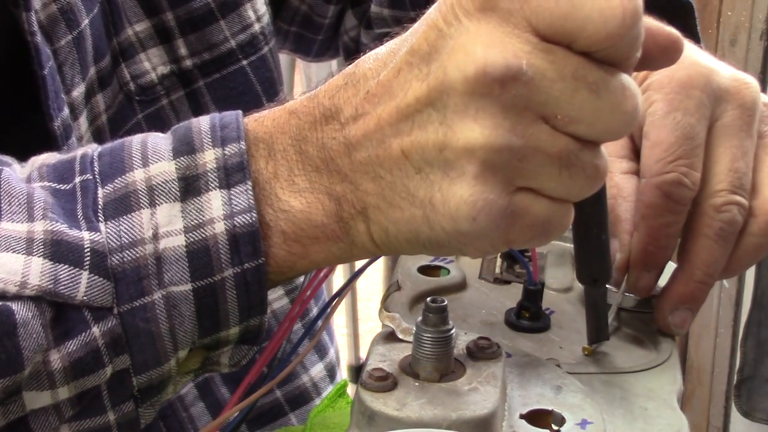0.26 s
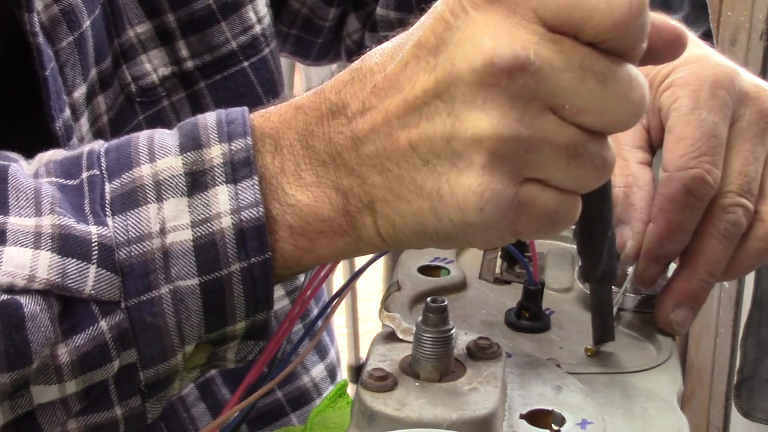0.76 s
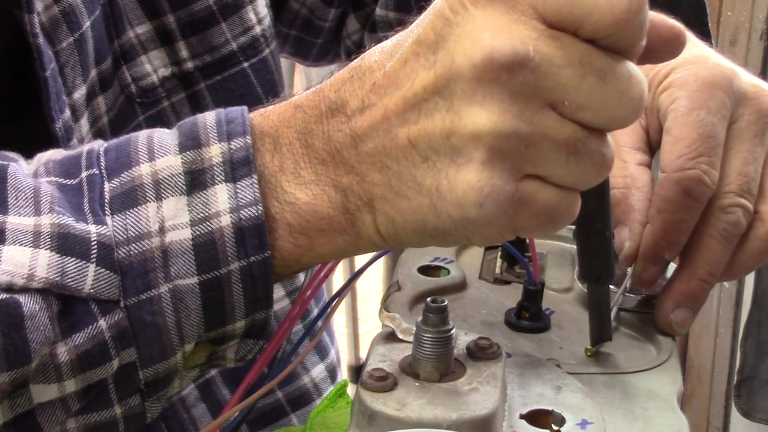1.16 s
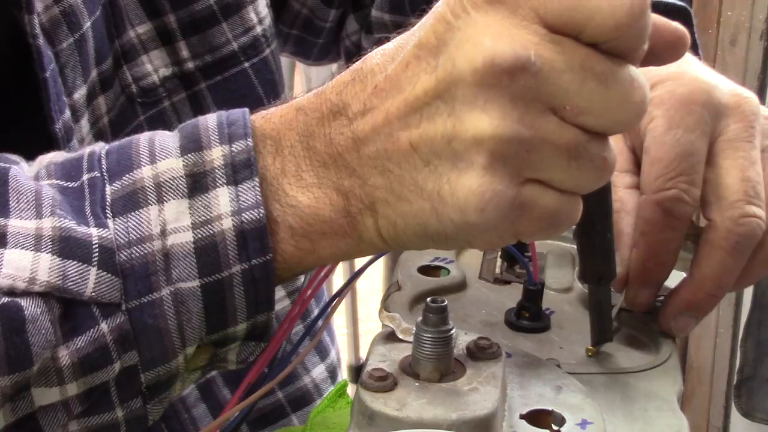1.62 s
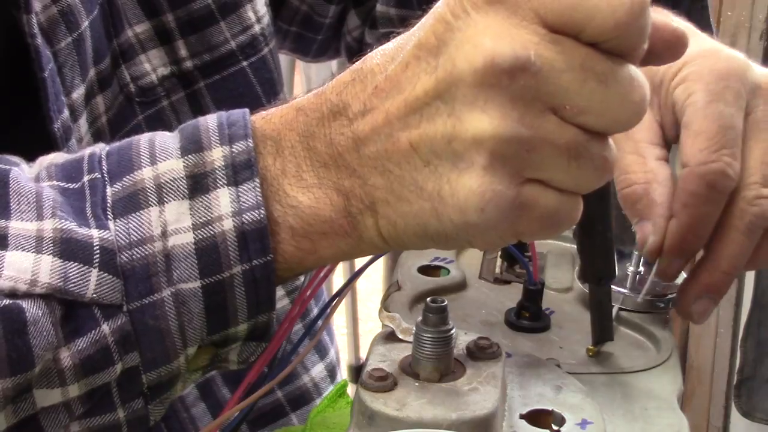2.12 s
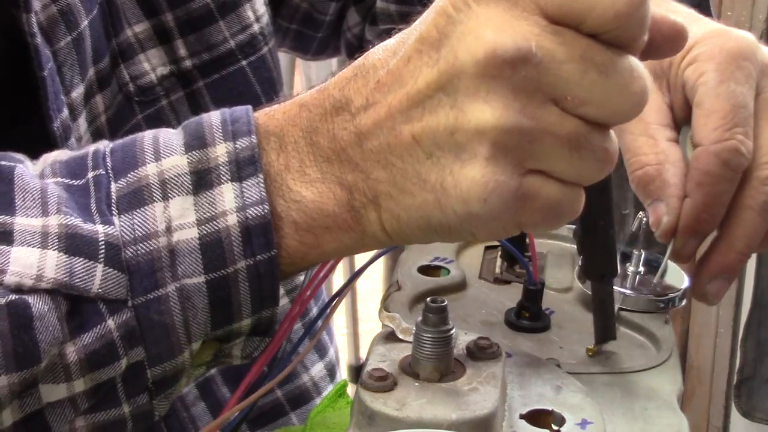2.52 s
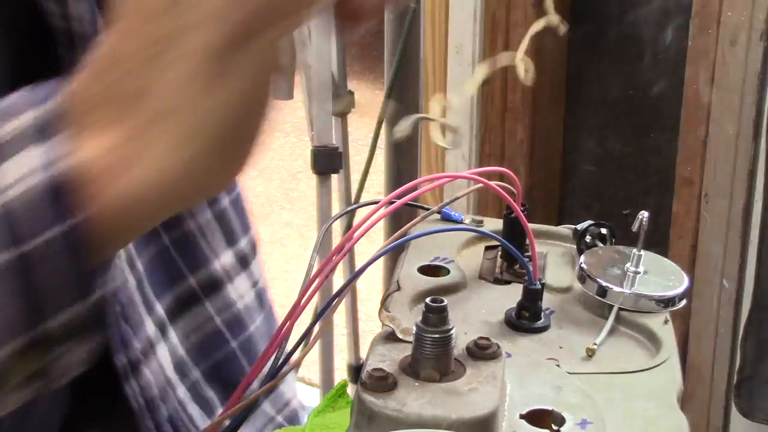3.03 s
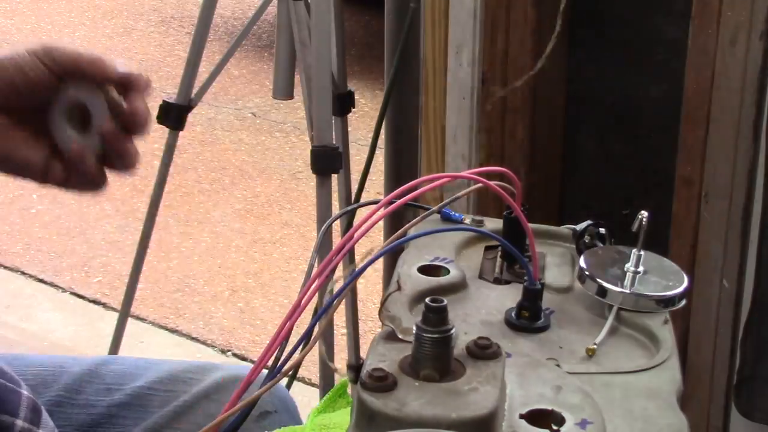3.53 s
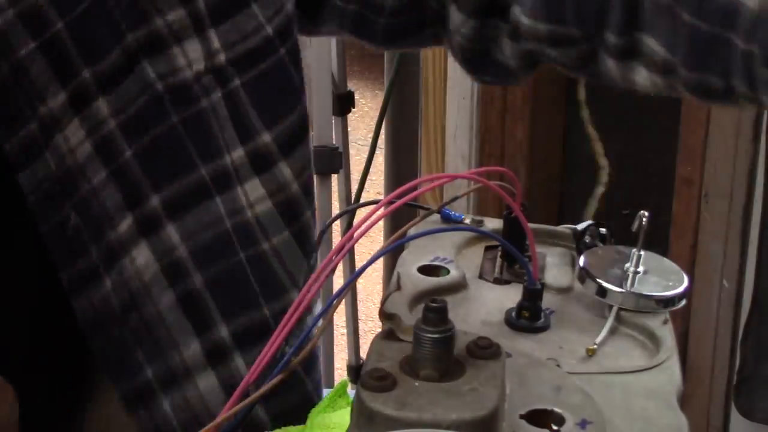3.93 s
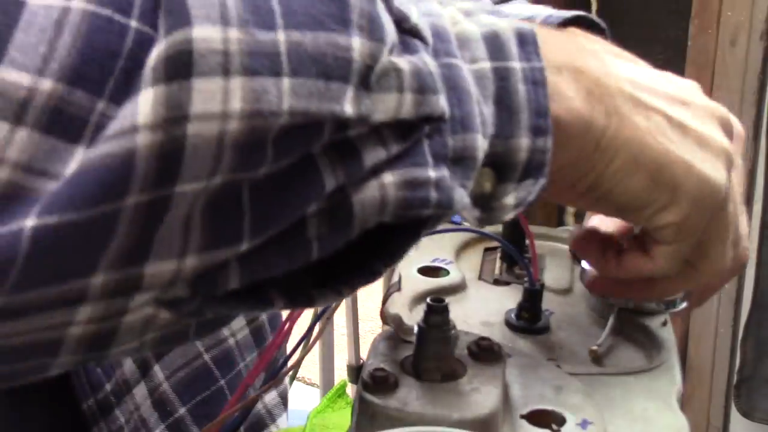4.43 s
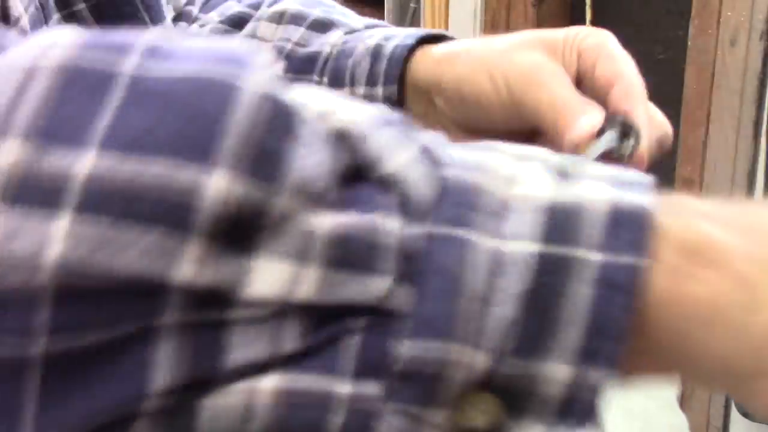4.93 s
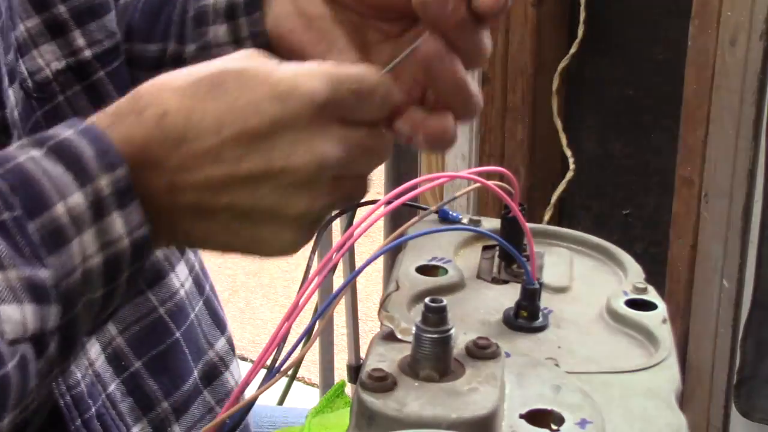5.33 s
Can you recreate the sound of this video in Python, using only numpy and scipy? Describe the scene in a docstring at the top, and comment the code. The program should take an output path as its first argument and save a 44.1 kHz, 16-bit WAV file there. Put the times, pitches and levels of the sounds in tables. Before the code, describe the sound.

Close small-metal handling in an open shed: tiny ticks, a scraping slide into a hollow stand, knocks, one loud landing, then a hard snap.

```python
"""Hands work on a small metal panel in an open shed doorway, close to the microphone. From the start there are
outdoor air, far traffic rumble, faint tones (one cricket-like), a throbbing whine and finger ticks: noise and clicks.
Contacts ring bench, hollow stand, panel and small bright hardware: resonators struck by bursts of clicks.
Then comes smooth friction; an iron is slid into its stand (grit feeds the same bodies) and single notes ring on.
Parts knock on the bench, a heavy part lands, later a magnet snaps and the panel shudders, then faint ticks."""
import sys
import numpy as np
from scipy import signal
from scipy.fft import rfft, irfft, next_fast_len
from scipy.io import wavfile

SR = 44100
rng = np.random.default_rng(int(sys.argv[2]) if len(sys.argv) > 2 else 0)


def put_to_file(sound):
    """Save the sound as 16-bit audio at rate SR, in the file named by the first command-line argument."""
    columns = np.atleast_2d(sound).T  # one column per channel
    safe = np.clip(columns, -1, 1)
    whole_steps = np.round(safe * 32767)
    wavfile.write(sys.argv[1], SR, whole_steps.astype(np.int16))


N = 245195


def from_db(db):
    """Decibels to gain."""
    return 10 ** (np.asarray(db) / 20)


def rms_one(x):
    """Scale to rms 1."""
    return x / np.sqrt(np.mean(x ** 2) + 1e-20)


def in_time(rows):
    """Columns of a level curve at every sample; silent outside it."""
    s, *columns = np.transpose(rows)
    t = np.arange(N) / SR
    return np.array([np.interp(t, s, column, left=-150, right=-150) for column in columns])


def high_pass(x, hz, order):
    """Butterworth low cut."""
    return signal.sosfilt(signal.butter(order, hz, "high", fs=SR, output="sos"), x)


def low_pass(x, hz):
    """Gentle first-order high cut."""
    return signal.sosfilt(signal.butter(1, hz, fs=SR, output="sos"), x)


def coloured(spectrum):
    """Noise shaped to a spectrum of (frequency [Hz], relative level per Hz [dB]), rms 1."""
    hz, db = np.transpose(spectrum)
    size = next_fast_len(N)
    log_hz = np.log(np.fft.rfftfreq(size, 1 / SR) + 1)
    gain = from_db(np.interp(log_hz, np.log(hz), db))
    return rms_one(irfft(rfft(rng.standard_normal(size)) * gain, size)[:N])


def waver(spread_db, rate_hz):
    """A gain that wanders by chance: noise through two equal low-pass poles, in decibels."""
    step = 40   # samples for which each gain is held
    warm_up = 2000
    r = np.exp(-2 * np.pi * rate_hz * step / SR)
    noise = rng.standard_normal(N // step + warm_up + 2)
    slow = signal.lfilter([1], [1, -2 * r, r * r], noise)[warm_up:N // step + warm_up + 1]
    return np.repeat(from_db(spread_db * rms_one(slow)), step)[:N]


def ring(force, hz, width_hz):
    """A damped resonator: a unit click sets a sine of height 1 ringing."""
    r, w = np.exp(-np.pi * width_hz / SR), 2 * np.pi * hz / SR
    return signal.lfilter([0, np.sin(w)], [1, -2 * r * np.cos(w), r * r], force + 1e-18)


def resonant_noise(hz, width_hz):
    """Noise through the same resonator twice, rms 1."""
    return rms_one(ring(ring(rng.standard_normal(N), hz, width_hz), hz, width_hz))


def grains(per_s, spread_db, count):
    """Random clicks of uneven size and sign."""
    sizes = from_db(spread_db * np.minimum(rng.exponential(1, count), 4))
    signs = rng.choice([-1, 1], count)
    return sizes * signs * (rng.random(count) < per_s / SR)


def air(level_db):
    """Outdoor air: broad noise of unsteady level."""
    # spectrum of the open air: (frequency [Hz], relative level per Hz [dB])
    air_spectrum = [(15, -55), (25, -40), (150, -4), (192, -9), (245, -7), (399, -5.5), (725, -2),
                    (1680, -5), (2460, -10.5), (3060, -7.5), (3800, -13), (11300, -21.5), (15200, -22.5),
                    (16500, -49)]
    return from_db(level_db) * waver(0.46, 12) * coloured(air_spectrum)


def rumble(level_db):
    """Far traffic: noise in low resonances that swell and fade separately."""
    # far resonances: (frequency [Hz], width [Hz], relative level [dB])
    resonances = [(189, 43, -15), (265.4, 26, -8.5), (330.5, 37, -8.5)]
    far = np.zeros(N)
    for hz, width_hz, db in resonances:
        far += from_db(db) * waver(3.86, 1.46) * rms_one(ring(rng.standard_normal(N), hz, width_hz))
    return from_db(level_db) * far


def background_tones():
    """Faint lasting tones, one low and two high and cricket-like: narrow resonant noise of flickering level."""
    # tones: (frequency [Hz], width of each resonator pass [Hz], level [dB], flicker spread [dB])
    tones = [(238.7, 4.5, -72, 1.5), (3480, 15, -74.5, 2.5), (4657, 12, -83.5, 2.5)]
    out = np.zeros(N)
    for hz, width_hz, db, flicker_db in tones:
        out += from_db(db) * waver(flicker_db, rate_hz=5) * resonant_noise(hz, width_hz)
    return out


def whine():
    """A thin high sine throbs evenly under a squared cosine, then stops."""
    tone_hz, level_db, end_s = 11122, -75.5, 2.82
    throbs_per_s, throb_peak_s = 15.0, 0.265
    t = np.arange(N) / SR
    throb = np.cos(np.pi * throbs_per_s * (t - throb_peak_s)) ** 2
    tone = np.sin(2 * np.pi * tone_hz * t)
    return from_db(level_db) * waver(1.5, 4.0) * (t < end_s) * throb * tone


def background():
    """The place around the bench: air and far rumble with their deep bass cut, plus faint tones and whine."""
    # slow levels: (time [s], air level [dB], far rumble level [dB])
    levels = [(0, -58, -58), (.7, -58.5, -59.5), (1.3, -59, -60.5), (1.7, -59, -64), (3.0, -57, -64.5),
              (5.56, -55.5, -63.5)]
    air_db, rumble_db = in_time(levels)
    outdoors = high_pass(air(air_db) + rumble(rumble_db), 55, order=2)
    return outdoors + background_tones() + whine()


def finger_ticks():
    """Faint finger ticks on the wire: sparse uneven clicks, band-passed."""
    ticks_per_s, click_db = 47, -44.5   # click level ahead of the band and of the spread in size
    band = signal.butter(2, [1500, 7000], "band", fs=SR, output="sos")
    return from_db(click_db) * signal.sosfilt(band, grains(ticks_per_s, 3.2, count=N) + 1e-18)


def contact_bursts(hit_s, hit_db):
    """Each contact is a first touch, then a dying rattle of clicks; gives sample places and forces."""
    # decay times [s]: every contact rattles longer while the iron is loose in its stand
    rattle_s, loose_rattle_s = 0.0038, 0.0081
    loose_from_s, loose_to_s = 3.1, 3.9
    after = np.arange(1300)   # samples
    clicks = grains(5000, 2.95, count=len(hit_s) * after.size)
    force = clicks.reshape(len(hit_s), -1) * 0.22
    loose = (hit_s > loose_from_s) & (hit_s < loose_to_s)
    decay_s = np.where(loose, loose_rattle_s, rattle_s)[:, None]
    force *= np.exp(-after / SR / decay_s)
    force[:, 0] = from_db(-7.5)   # the first touch
    force *= from_db(hit_db)[:, None]
    at = ((hit_s[:, None] * SR).astype(int) + after).ravel()
    return at, force


def body(modes, broad, hit_s, hit_db, slide, mode_db, luck_db):
    """Hits strike each mode with a strength of their own; sliding grit feeds the same modes."""
    at, rattle = contact_bursts(hit_s, hit_db)
    low_hz, high_hz, broad_db = broad
    grit = rms_one(grains(2300, 2.0, count=N) * waver(2.2, 37.3))
    grit *= slide * np.sqrt(2 * (high_hz - low_hz) / SR)   # slide is then about the level in the band
    rings = np.zeros(N)
    for hz, width_hz, db in modes:
        luck = from_db(rng.normal(0, luck_db, (len(hit_s), 1)))
        hits = np.bincount(at, (rattle * luck).ravel(), N)[:N]
        force = hits + grit * waver(luck_db, 17.0)
        rings += from_db(db + mode_db) * ring(force, hz, width_hz)
    rings = high_pass(rings, 0.81 * low_hz, order=2)   # small bodies radiate no bass
    band = signal.butter(3, [low_hz, high_hz], "band", fs=SR, output="sos")
    clatter = signal.sosfilt(band, np.bincount(at, rattle.ravel(), N)[:N] + grit)
    spread = from_db(broad_db) * SR / (2 * (high_hz - low_hz))   # a unit click comes out about broad_db high
    return rings + spread * clatter


def hardware(s, hit_db, rub):
    """Small bright hardware: treble modes of nearly constant balance and a broad clatter."""
    # modes: (frequency [Hz], width [Hz], relative level [dB])
    modes = [(4020, 180, -14), (4315, 140, 1), (4910, 240, 3.5), (5440, 130, -5), (5770, 110, -7),
             (6216, 58, -5.5), (6760, 150, -11.5), (7160, 580, -15), (7670, 600, -26)]
    # clatter: (low edge [Hz], high edge [Hz], level [dB])
    broad = (4000, 9000, 0)
    return body(modes, broad, s, hit_db, rub * from_db(-0.5), mode_db=-16.5, luck_db=0.5)


def stand(s, hit_db, rub):
    """The hollow stand: a few low-mid modes, struck unevenly."""
    # modes: (frequency [Hz], width [Hz], relative level [dB])
    modes = [(650, 80, -14.5), (770.6, 40, -1), (826, 50, -7.5), (950, 71, -13), (1050, 56, -13)]
    # clatter: (low edge [Hz], high edge [Hz], level [dB])
    broad = (610, 1160, -7.5)
    return body(modes, broad, s, hit_db, rub * from_db(-4), mode_db=-6, luck_db=3.5)


def panel(s, hit_db, rub):
    """The metal panel: many middle modes, struck unevenly."""
    # modes: (frequency [Hz], width [Hz], relative level [dB])
    modes = [(1212, 48, -5), (1437, 75, 2), (1708, 82, -1), (1822, 78, 0.5), (2065, 35, -11),
             (2304, 270, 3.5), (2702, 61, -6), (3072, 130, -5), (3530, 28.6, -19), (3784, 34, -20)]
    # clatter: (low edge [Hz], high edge [Hz], level [dB])
    broad = (1100, 4000, -1)
    return body(modes, broad, s, hit_db, rub * from_db(-6.5), mode_db=-12.5, luck_db=3.5)


def fine_parts(s, hit_db, rub):
    """The finest parts: modes at the top of the treble, struck very unevenly."""
    # modes: (frequency [Hz], width [Hz], relative level [dB])
    modes = [(8900, 420, -2), (10900, 460, -4), (13100, 400, 0.7), (15740, 400, 6)]
    # clatter: (low edge [Hz], high edge [Hz], level [dB])
    broad = (10570, 16100, 0)
    return body(modes, broad, s, hit_db, rub * from_db(-4), mode_db=-17.5, luck_db=4.0)


def shed(x):
    """A short diffuse tail of unit energy, duller than the direct sound."""
    t60_s, onset_s = 0.15, 0.0036
    t = np.arange(SR // 3) / SR
    tail = rng.standard_normal(t.size) * from_db(-60 * t / t60_s) * np.minimum(t / onset_s, 1)
    tail = low_pass(tail, 7000)
    return signal.fftconvolve(x, tail / np.sqrt(np.sum(tail ** 2)))[:N]


def lift():
    """Smooth friction noise in a few wide resonances that each swell in their own time."""
    # resonances: (frequency [Hz], width of each pass [Hz], relative level [dB], late start [s], early end [s])
    bands = [(830, 390, -0.5, 0, 0), (3360, 870, 2, 0.046, 0), (4200, 700, -1, 0, .1),
             (5000, 1000, 1, 0, 0.0053), (6560, 600, -2, 0.055, 0.012), (7480, 600, -6, .08, 0.011),
             (9000, 5000, -0.5, 0, 0.066)]
    first_s, swell_s, last_s, release_s, level_db = 2.855, 0.05, 3.07, 0.035, -59.5
    t = np.arange(N) / SR
    rub = np.zeros(N)
    for hz, width_hz, db, late_s, early_s in bands:
        start_s, end_s = first_s + late_s, last_s - early_s
        corners = [start_s, start_s + swell_s, end_s, end_s + release_s]
        swell = np.interp(t, corners, [0, 1, 1, 0])
        rub += from_db(db) * swell * waver(2.0, 8.0) * resonant_noise(hz, width_hz)
    return from_db(level_db) * rub


def strokes():
    """Rubbing pressure of part along part, on stand, panel and hardware: each stroke swells, holds and fades."""
    # strokes: (start [s], hold [s], panel level [dB], stand over panel [dB], hardware over panel [dB])
    rubs = [(3.116, 0.066, -41.5, 0, -4), (3.186, 0.066, -45, -2, -11), (3.27, 0.021, -45.5, -6, -4.5),
            (3.358, 0.028, -46, 9, 1), (3.433, 0.087, -54.5, 8.5, -7.5), (3.724, 0.051, -45.5, 5.5, 0.5),
            (3.794, 0.065, -47.5, 6, -3), (3.898, 0.059, -53.5, 2, -4.5), (4.126, 0.032, -45, -2, -2),
            (4.26, 0.075, -59, 1, -2.5), (4.59, 0.028, -54, -5, -3.5), (4.675, .09, -46, -7, -8.5),
            (4.771, 0.048, -51, -5, -6)]
    attack_s, fade_db_per_s = 0.02, 252
    t, power = np.arange(N) / SR, np.zeros((3, N))
    for start_s, hold_s, db, stand_db, hardware_db in rubs:
        swell = np.clip((t - start_s) / attack_s, 0, 1) ** 1.5
        past_s = np.maximum(t - start_s - attack_s - hold_s, 0)
        shape = swell * from_db(db - fade_db_per_s * past_s)
        power += (shape * from_db([[stand_db], [0], [hardware_db]])) ** 2
    return np.sqrt(power)


def pings():
    """Stand, panel and small parts each ring on a note: a sine that starts within a millisecond and dies away."""
    # ringing notes: (time [s], frequency [Hz], width [Hz], level [dB])
    notes = [(3.155, 772, 37, -29), (3.184, 6720, 21, -34), (3.273, 1205, 28, -22.5), (3.275, 798, 20, -27),
             (3.39, 15100, 8.6, -48), (3.413, 767, 25, -22.5), (3.735, 10850, 9.4, -39),
             (3.735, 8960, 43, -25.5), (3.735, 780, 45, -27), (3.773, 4470, 22, -32.5),
             (4.121, 790, 78, -7), (4.121, 1357, 95, -11.5), (4.121, 1794, 61, -14),
             (4.282, 751, 16.6, -31), (4.582, 1645, 58, -18.5), (4.584, 2190, 150, -20.5),
             (4.775, 12900, 33, -41), (4.958, 1420, 33, -13.5)]
    t = np.arange(SR // 4) / SR
    onset = np.minimum(t / 0.00045, 1)
    out = np.zeros(N)
    for s, hz, width_hz, db in notes:
        note = np.sin(2 * np.pi * hz * t) * np.exp(-np.pi * width_hz * t) * onset
        out[int(s * SR):int(s * SR) + t.size] += from_db(db) * note
    return out


def bench(rub):
    """Things land on the bench, which rings low; the strokes on the stand reach it faintly."""
    # landings: (time [s], hit level [dB])
    thuds = [(3.7338, -29), (3.8524, -39.5), (4.12, -17), (4.1613, -26), (4.195, -37), (4.9555, -29.5)]
    # modes: (frequency [Hz], width [Hz], relative level [dB])
    modes = [(243, 107, 5), (327, 107, 1), (490, 105, -8)]
    # clatter: (low edge [Hz], high edge [Hz], level [dB])
    broad = (290, 640, -6.5)
    return body(modes, broad, *np.transpose(thuds), rub * from_db(-22), mode_db=-8.5, luck_db=1.0)


def landing_lean():
    """Gain of the near treble between the sides: hits nearly centred, the loud landing very slightly right."""
    landing_s, length_s, landing_db, usual_db = 4.113, 0.012, -15.5, -40
    since_s = np.arange(N) / SR - landing_s
    landing = (since_s > 0) & (since_s < length_s)
    return from_db(np.where(landing, landing_db, usual_db))


def shudder():
    """The panel shudders after a magnet snap: too many modes to tell apart, so noise that dies away."""
    # shudders: (time [s], level [dB], time to fall 60 dB [s])
    shudders = [(4.946, -24, 0.096), (4.957, -16, 0.15)]
    # their spectrum: (frequency [Hz], relative level per Hz [dB])
    spectrum = [(88, -62), (150, -28), (448, -5.5), (689, -20), (745, -8), (1480, -11.5), (1630, -7.5),
                (6510, -14), (16000, -50.5)]
    t = np.arange(N) / SR
    decay = np.zeros(N)
    for s, db, t60_s in shudders:
        decay += (t > s) * from_db(db - 60 * np.abs(t - s) / t60_s)
    return decay * coloured(spectrum)


def handling():
    """Everything the hands set sounding: ticks, struck and rubbed bodies, friction, ringing notes and shudder."""
    # contacts: (time [s], hardware hit level [dB], stand over hardware [dB], panel over hardware [dB],
    # finest parts over hardware [dB])
    contacts = [(0.5415, -43, -2, 1.5, -2.5), (0.606, -38, -25, -2.5, -9), (0.6167, -41.5, -7, 0, -8),
                (0.9113, -48.5, -8, 2, -6), (1.0286, -53, 6, 7, -14), (1.224, -48, -8, 0, -14),
                (1.3383, -53, 5.5, 10, -1), (1.6651, -43, -17, -17, -15), (1.8492, -46.5, -9, -1.5, -9),
                (2.0407, -46, -16, -8, -6), (2.0766, -50.5, 1, 8, -14), (2.157, -42.5, -5.5, -5, -15),
                (2.1827, -42.5, -6, 0.5, -6), (2.617, -45, -0.5, 1.5, -15), (2.688, -46.5, -2, 2.5, -15),
                (2.7285, -41.5, 1, 7.5, -17), (2.817, -50, -20, -3, -22), (2.916, -41, -28, -19, -1),
                (3.1591, -23, -11.5, -11.5, -21), (3.246, -43.5, 10, 10, -11), (3.2748, -35, 5.5, 8.5, 8.5),
                (3.3439, -44, 12.5, -7, -10), (3.372, -48.5, 14, -5, -10), (3.3835, -19.5, -17, -11, -0.5),
                (3.412, -26, 3, -11.5, -14), (3.508, -47, 13, -5, -15), (3.534, -45, 0, 4, -14),
                (3.7343, -17.5, -9, -8.5, -14), (3.7726, -28.5, -8, -11, -19), (3.7934, -23, -9, 0, -8),
                (3.8524, -33, 0, -16, 6), (3.96, -45, 9.5, -8, -5), (4.0098, -34, -32, -11, 3),
                (4.1148, -12.5, -15, -11.5, 13.5), (4.1176, -15, -12, -13, 7.5), (4.12, -5, -9, -5, -1),
                (4.1613, -18, -13, -4.5, 2.5), (4.1813, -30, -7, 6, 9), (4.1947, -33.5, -3, 7, 7),
                (4.2814, -47, 9, 5, -7), (4.3188, -40, -1, -3.5, 4), (4.38, -38, -24, -6, -6),
                (4.4626, -27, -34, -8, -8), (4.4743, -34, -25, -12, -12), (4.4891, -28.5, -30, -6, -10),
                (4.535, -38, -31, -6, -16), (4.5462, -46.5, -13, 16, -9), (4.584, -27.5, -17, 5, -19),
                (4.5926, -26, -30, 5, -11), (4.644, -54.5, 12.5, 3, -8), (4.683, -40, -20, 10.5, -8),
                (4.709, -22.5, -31, -5, -1), (4.7347, -43, -2, 4, -6), (4.7538, -41.5, -1, 11.5, -4),
                (4.775, -33, -32, 9, 5), (4.845, -52, 8.5, 2, 0), (4.9444, -5, -10, 2, -13),
                (4.9556, -7.5, -5.5, 4, -27), (5.3642, -42.5, -5.5, 2.5, 9),
                (5.4005, -39.5, -20.5, -0.5, -1), (5.4454, -46.5, -12, -7, 10.5)]
    s, hardware_db, stand_db, panel_db, fine_db = np.transpose(contacts)
    on_stand, on_panel, on_hardware = strokes()
    struck = bench(on_stand)
    struck += stand(s, hardware_db + stand_db, on_stand)
    struck += panel(s, hardware_db + panel_db, on_panel)
    struck += hardware(s, hardware_db, on_hardware)
    struck += fine_parts(s, hardware_db + fine_db, on_hardware)
    return struck + finger_ticks() + pings() + lift() + shudder()


def scene():
    """Nearly centred sound close by, its tail in the shed, and a little air that differs between the sides."""
    # left-right part of the air: (frequency [Hz], relative level per Hz [dB])
    side_spectrum = [(15, -48), (25, -0.5), (97, -1), (418, 9.5), (636, 11.5), (743, 9.5), (1350, 5),
                     (3000, -6), (5000, -20.5), (6500, -50), (11000, -120)]
    near = high_pass(handling(), 208, order=4)   # the microphone's low cut
    mid = near + from_db(-11.5) * shed(near) + background()
    treble = high_pass(near, 5000, order=1)
    side = from_db(-71) * coloured(side_spectrum) - landing_lean() * treble
    return np.array([mid + side, mid - side])


def record(dry):
    """Peaks past full scale overload the input; the clipping error loses its deep bass, and the top is cut."""
    error = np.clip(dry, -1, 1) - dry
    clipped = np.clip(dry, -1, 1) - low_pass(error, 150)
    top_cut = signal.cheby2(12, 60, 16600, fs=SR, output="sos")   # 60 dB down from 16600 Hz up
    return signal.sosfilt(top_cut, clipped)


dry = scene()
out = record(dry)
put_to_file(out)
```